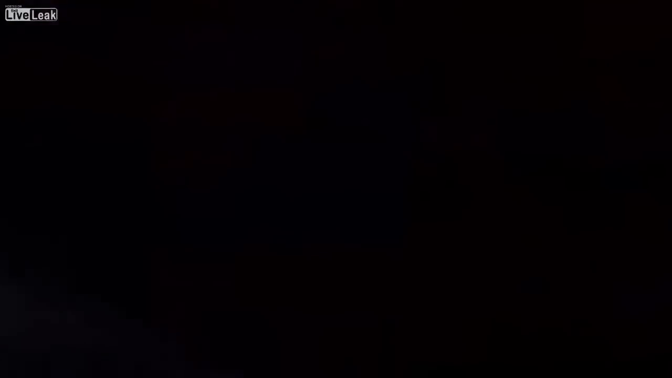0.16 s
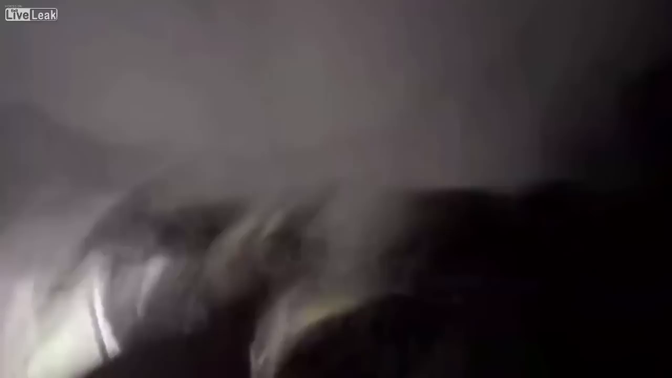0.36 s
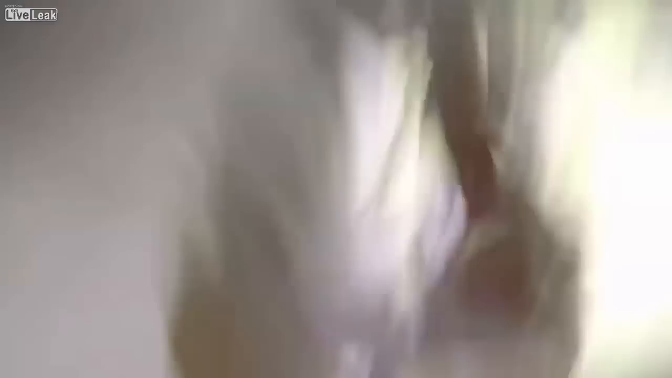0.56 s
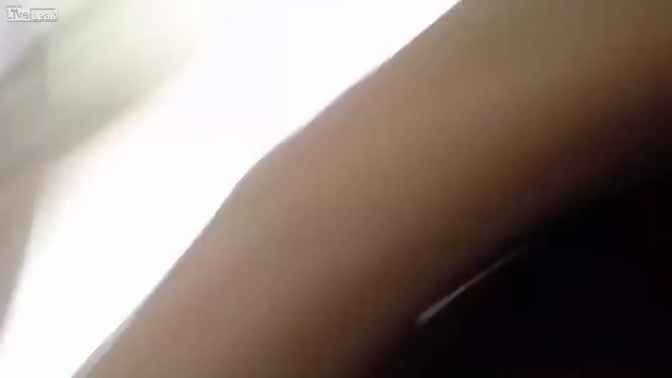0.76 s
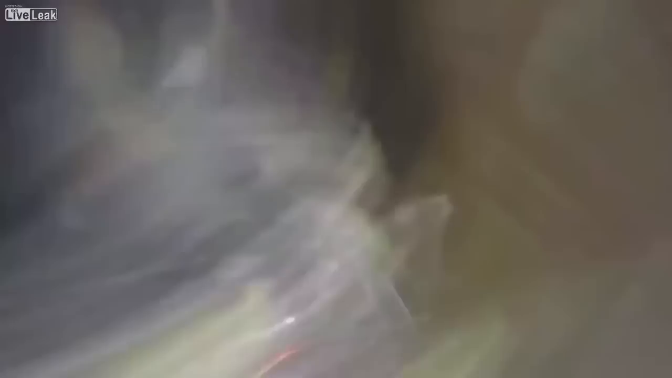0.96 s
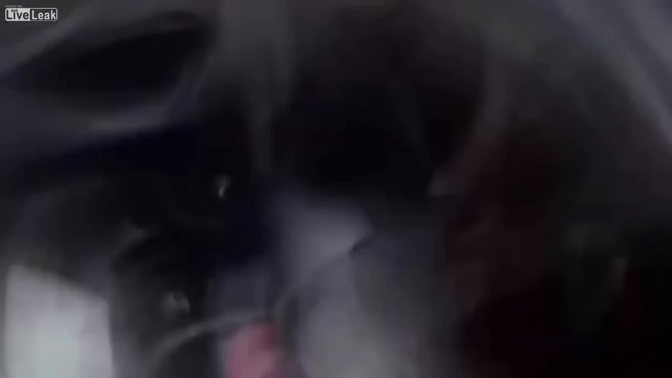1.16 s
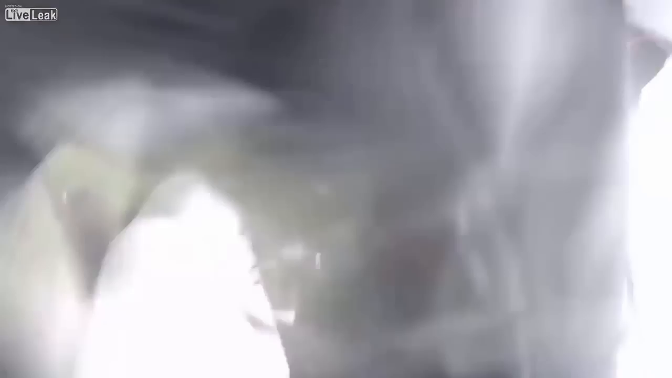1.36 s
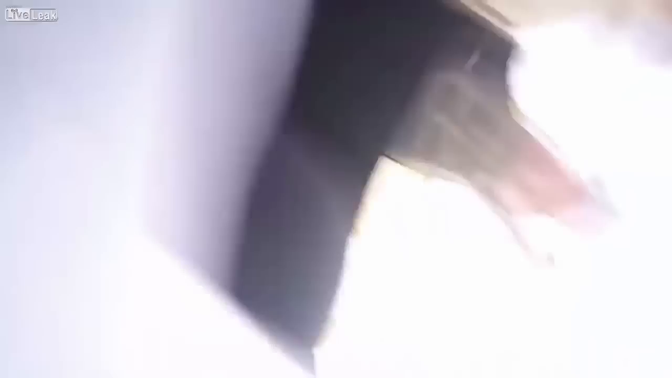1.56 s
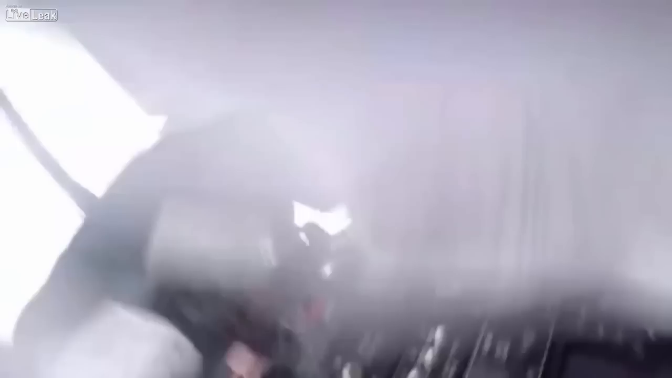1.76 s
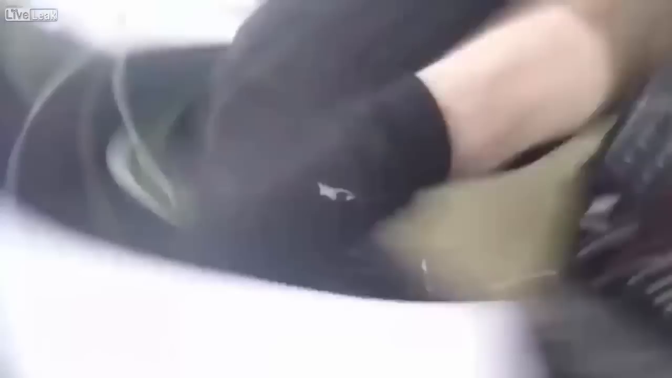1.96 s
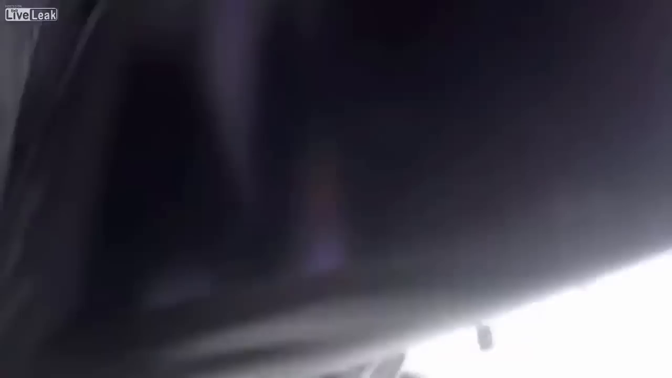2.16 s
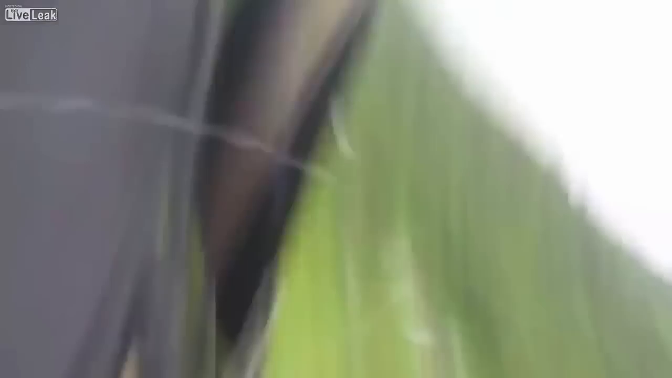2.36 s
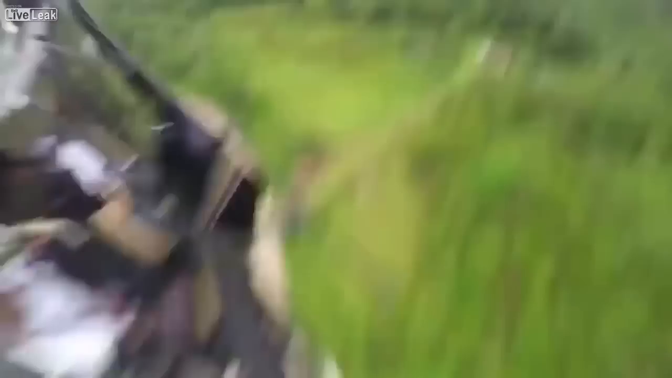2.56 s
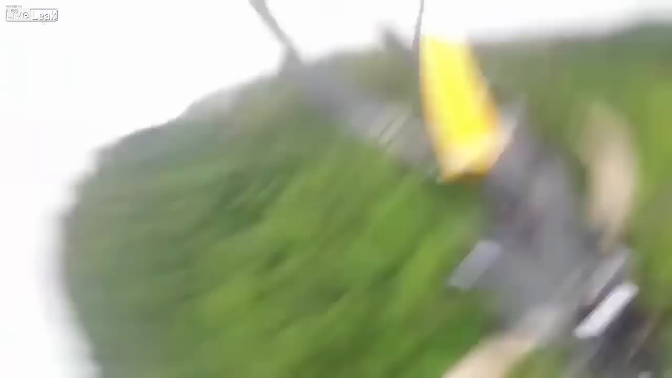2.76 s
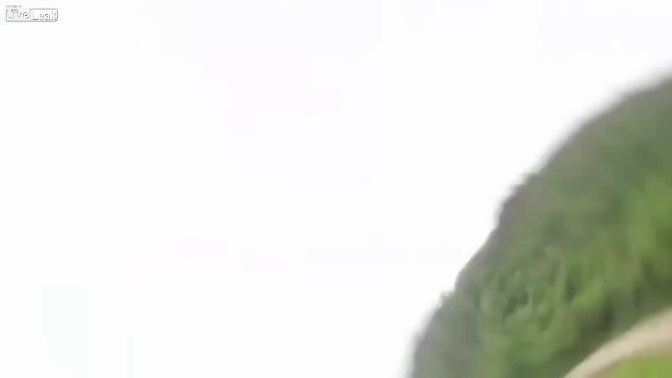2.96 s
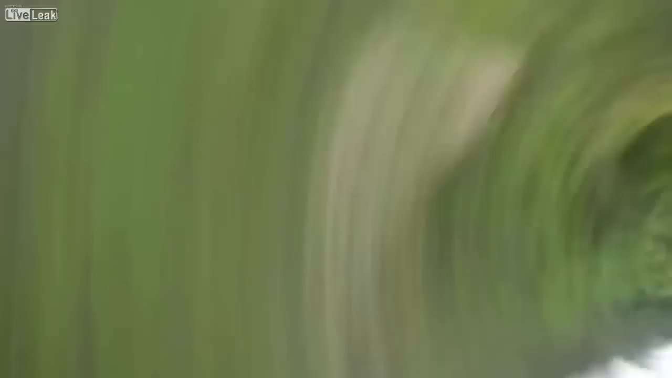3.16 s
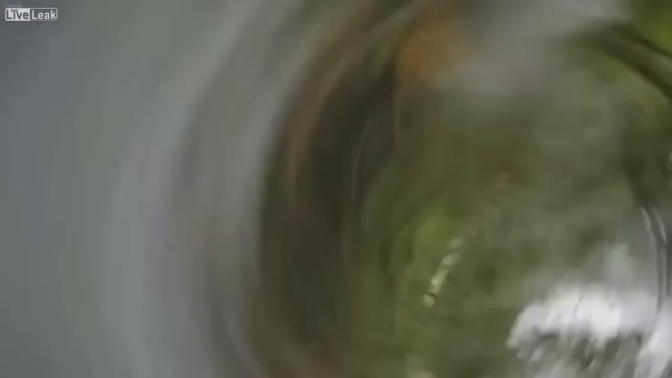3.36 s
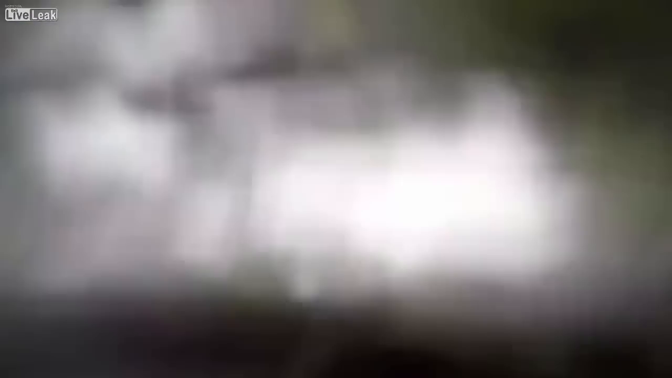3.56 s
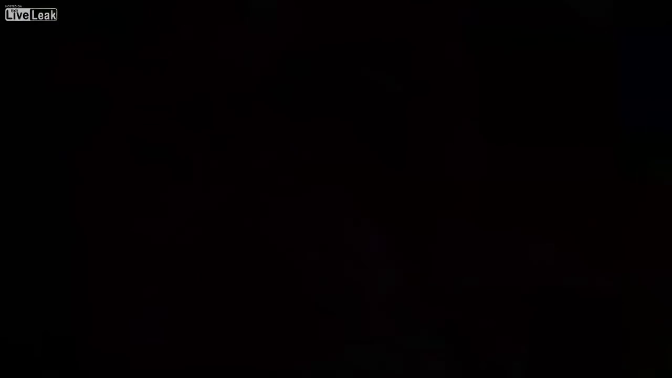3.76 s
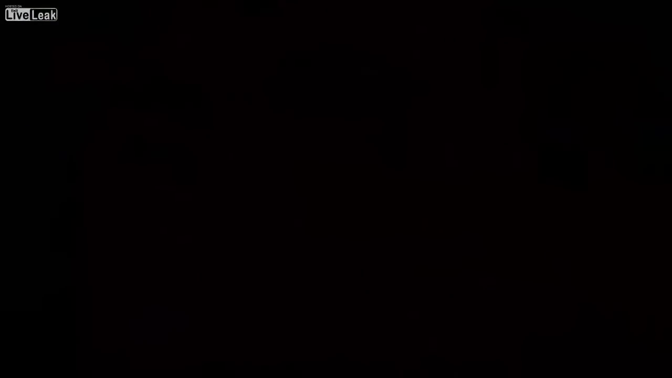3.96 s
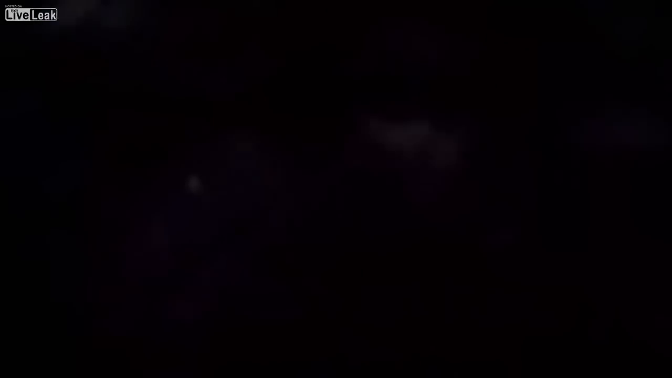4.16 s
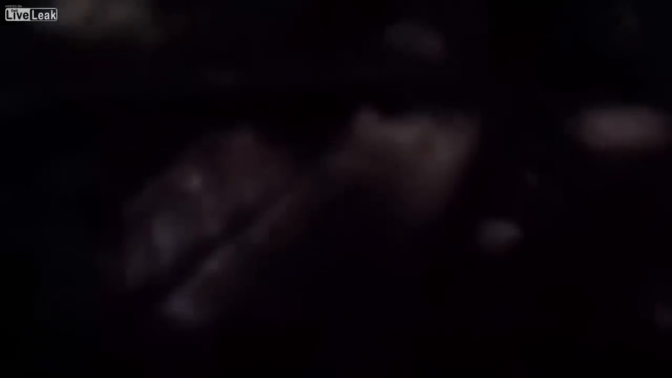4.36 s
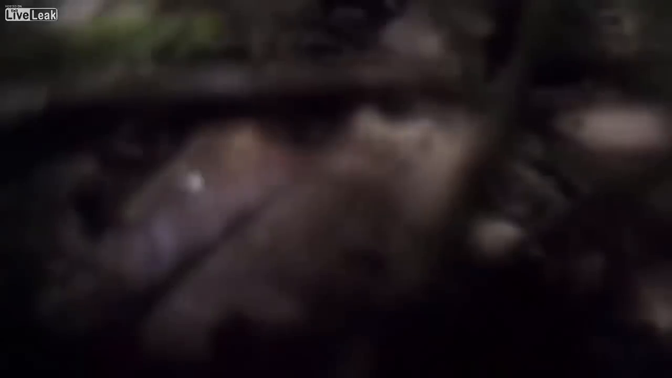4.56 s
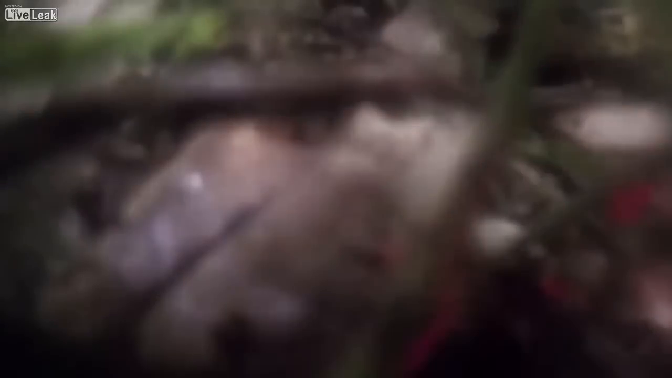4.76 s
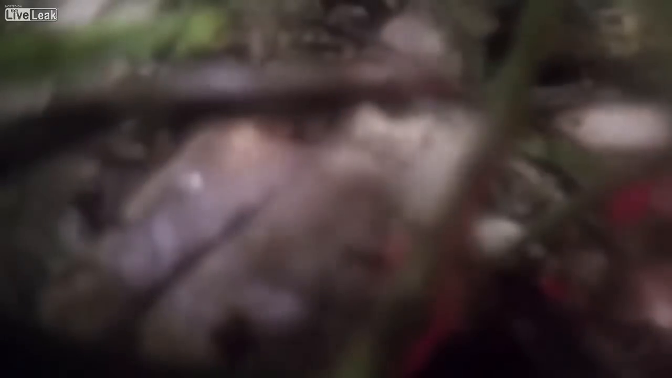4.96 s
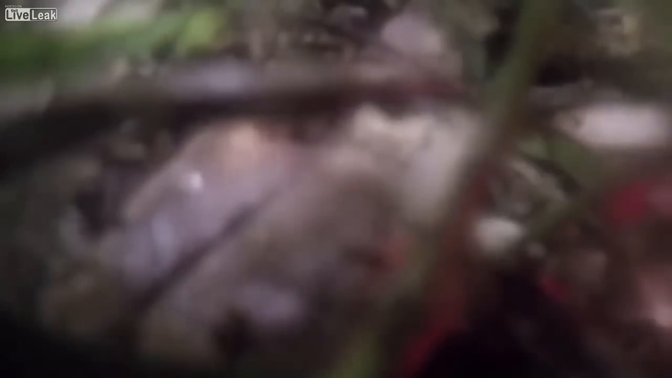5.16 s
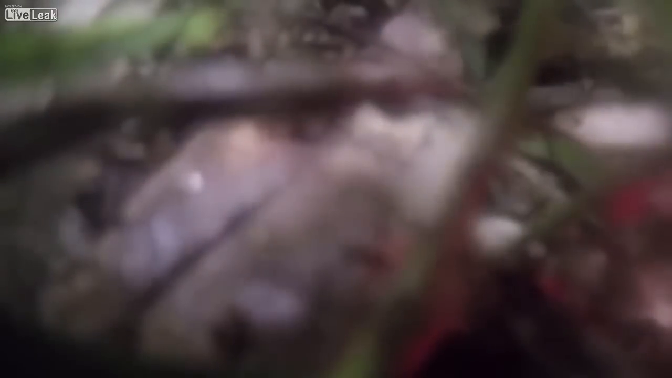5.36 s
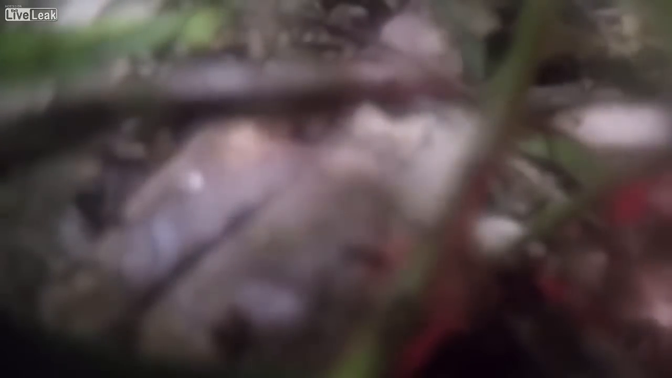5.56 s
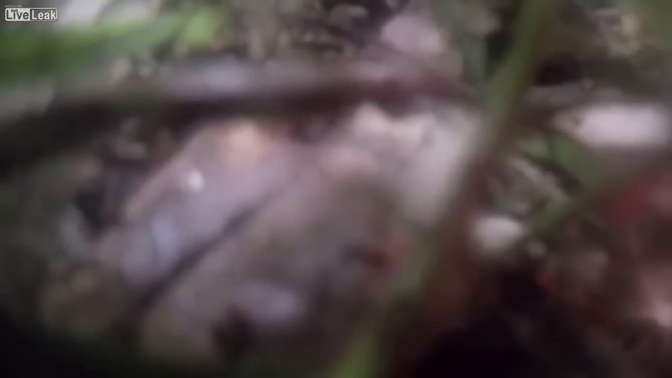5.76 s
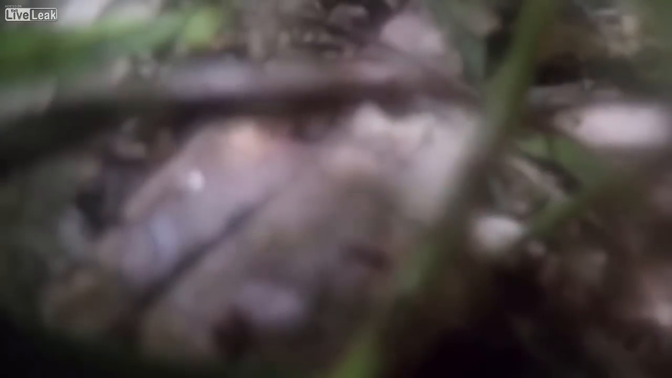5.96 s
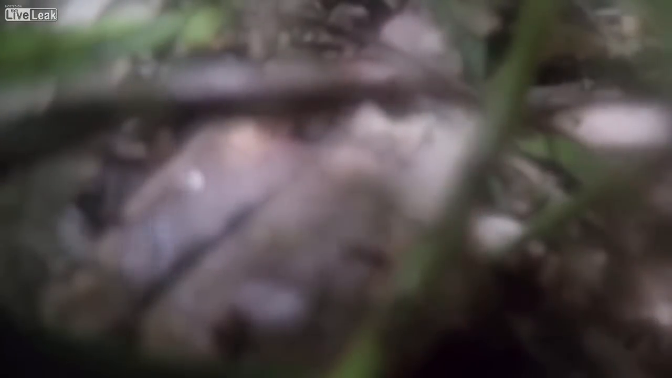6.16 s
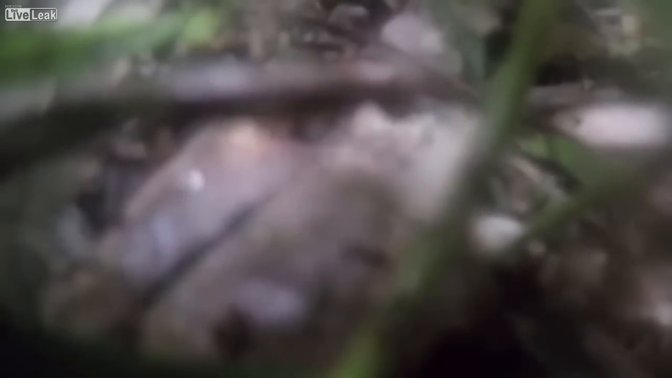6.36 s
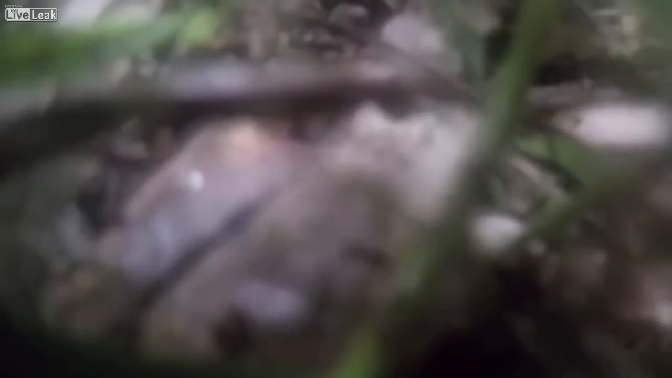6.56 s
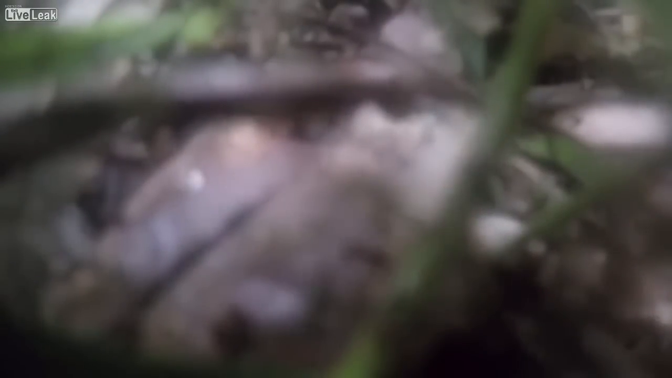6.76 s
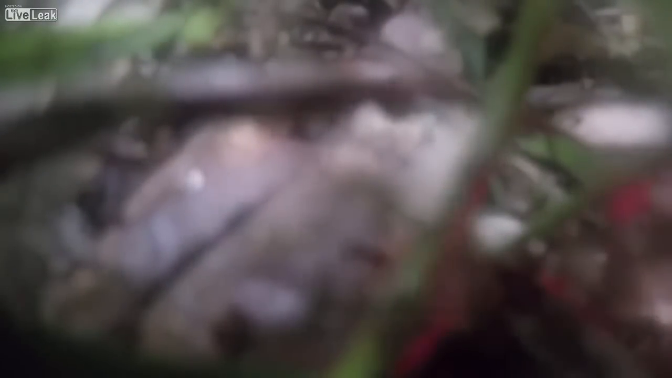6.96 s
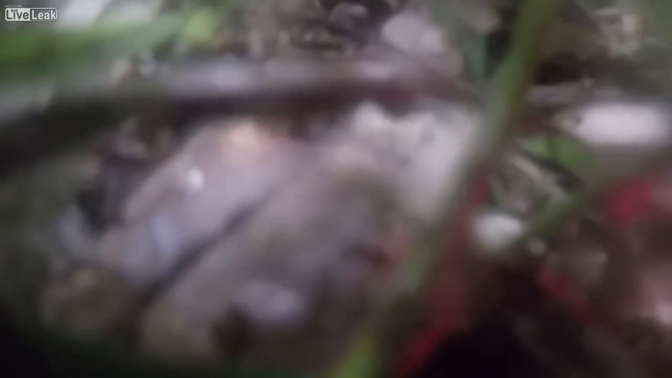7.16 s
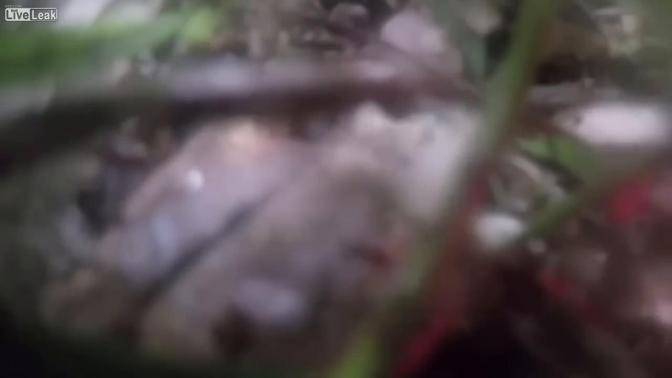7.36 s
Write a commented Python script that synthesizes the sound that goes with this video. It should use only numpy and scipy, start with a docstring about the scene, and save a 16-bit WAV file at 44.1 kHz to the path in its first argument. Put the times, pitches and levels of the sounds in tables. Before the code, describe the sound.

Violent clattering blows and splintering wreckage, a fluttering rush of air, a crashing landing through foliage, then quiet undergrowth with tiny twig taps.

```python
"""A cased camera thrown from a breaking helicopter

A helicopter breaks up around a small camera in a hard case: the camera is battered about the cabin, is flung
out through rushing air, crashes through branches and settles in the undergrowth, where twigs tick.
Blows are bursts of noise filtered by the struck piece; case and metal fitting ring as decaying modes, and the
air inside heaves. Wreckage, wind and leaves are coloured, fluctuating noise; the microphone overloads softly."""
import sys
import numpy as np
from scipy import signal
from scipy.fft import rfft, irfft
from scipy.io import wavfile
from scipy.ndimage import uniform_filter1d

SR = 44100
rng = np.random.default_rng(int(sys.argv[2]) if len(sys.argv) > 2 else 0)


def store_wav(level_fs):
    """Save 16-bit WAV to argv[1]."""
    pcm = np.round(np.clip(np.atleast_2d(level_fs), -1, 1) * 32767)
    wavfile.write(sys.argv[1], SR, pcm.T.astype(np.int16))


N = 326340
TIME = np.arange(N) / SR  # seconds
FREQS = np.fft.rfftfreq(N, 1 / SR)  # hertz

# Blows on the case. Each row: start in seconds, contact length in seconds, level in dB before the blow trim,
# hardness in dB (negative a dull knock, positive a brittle snap), pitch of the struck piece in Hz,
# peak heave of the air inside in dB.
BLOWS = [(0.0207, 0.0075, -13, -7.5, 1855, -7.5), (.107, 0.0012, -17, -10.5, 1100, -40),
         (.144, 0.0027, -17.5, -8, 670, -41), (.161, .015, -29.5, -13, 940, -33),
         (.207, 0.00075, -16.5, -12, 1060, -46.5), (0.221, 0.0037, -15, -9.5, 1110, -40),
         (.229, 0.0036, -20, -13, 880, -40), (0.237, 0.0025, -11.5, -10, 1910, -21),
         (0.253, 0.0009, -8, -7, 730, -30), (0.282, 0.0034, -24, -8, 487, -10.5),
         (0.313, 0.0055, -19, -1, 3420, -33), (0.321, 0.011, -19, -1.5, 1780, -21.5),
         (0.329, 0.013, -10, -3, 1910, -9.5), (0.3504, 0.016, -20, -3.5, 990, -9),
         (0.3852, 0.0028, -8.5, -2, 3000, -14), (.392, .004, -22.5, 5.5, 1850, -35),
         (.4315, 0.0046, -16, 8, 3380, -43), (.448, 0.0031, -14.5, 19, 3327, -21),
         (0.538, 0.0036, -16, 8, 2600, -16.5), (0.585, 0.0033, -21.5, 6.5, 1880, -30),
         (0.6138, 0.0017, -10.5, -46, 1050, -22.5), (.648, 0.0047, -11.5, -22, 1040, -12.5),
         (0.6556, 0.0042, -25.5, 8.5, 3300, -35), (.692, 0.0036, -18, -11, 530, -7.5),
         (.73, 0.0022, -23, 12.5, 1060, -34.5), (0.817, 0.0047, -23.5, 15.5, 8600, -17.5),
         (0.8746, 0.0034, -3, -1.5, 1680, -22.5), (.88, 0.006, -16.5, 2.5, 1600, -28.5),
         (.892, 0.0036, -4.5, 0, 2520, -7), (.919, 0.006, -22, 8, 2610, -33),
         (.929, 0.01, -21.5, 8.5, 2550, -23), (0.97, 0.014, -10, -1.5, 1770, -7.5),
         (.985, 0.0076, -13, 4.5, 1270, -12), (0.997, .015, -12.5, -1.5, 1800, -8.5),
         (1.033, .009, -10.5, -3.5, 1920, -14.5), (1.0812, 0.0082, -13.5, -2.5, 1890, -14.5),
         (1.086, 0.0033, -16.5, -1.5, 1660, -24), (1.112, 0.0084, -13.5, -6, 1490, -26.5),
         (1.118, 0.0024, -10.5, -7.5, 932, -5.5), (1.133, 0.0088, -20, -1, 1600, -19),
         (1.154, 0.0043, -9.5, 0.5, 2194, -18), (1.17, .005, -20.5, 1.5, 1780, -23),
         (1.1789, 0.0087, -15, 0.5, 1990, -22), (1.201, 0.0066, -11, -3.5, 1610, -9),
         (1.223, 0.0036, -16, -6.5, 1610, -30), (1.243, 0.0078, -10.5, -2, 1920, -19),
         (1.2959, 0.0031, -11.5, 5.5, 2260, -13.5), (1.35, 0.0075, -9.5, -1.5, 2120, -5.5),
         (1.384, 0.0035, -14, 15, 2600, -9.5), (1.4107, 0.0025, -9.5, 1, 2400, -11),
         (1.42, 0.0059, -19.5, 13.5, 8400, -26.5), (1.448, .008, -26, 15, 2840, -26),
         (1.5131, 0.0052, -8, -5, 1134, -7.5), (1.537, 0.004, -17.5, 3, 2350, -29),
         (1.5488, 0.0045, -20.5, 16.5, 4990, -27), (1.5643, 0.0027, -4.5, -2.5, 3340, -9),
         (1.7, 0.0057, -26, 4.5, 2120, -30), (1.779, 0.0052, -6.5, -4, 2800, -5.5),
         (1.8365, 0.0038, -20.5, -3.5, 1860, -38.5), (1.849, 0.004, -11, 4, 1600, -27.5),
         (1.868, 0.0096, -20.5, -2, 960, -24.5), (1.882, 0.0078, -5.5, 0.5, 1910, -3),
         (1.9563, 0.0016, -10.5, -15, 520, -3.5), (2.041, 0.0049, -29, 9, 2090, -50),
         (2.076, 0.013, -37, 7.5, 3080, -46), (2.152, 0.0042, -16.5, 15.5, 3360, -55),
         (2.356, 0.0053, -39, 17.5, 8400, -52), (2.417, 0.005, -16.5, -11, 477, -5.5),
         (2.51, 0.0035, -25, -3.5, 494, -11.5), (3.103, 0.013, -17, -1.5, 2110, -31.5),
         (3.304, 0.0077, -20, -7, 478, -7.5), (3.339, 0.0032, 2, -2, 1750, -4.5),
         (3.3926, 0.0057, -21, 20, 6200, -32.5), (3.427, 0.0048, -12, 8, 1720, -30),
         (3.501, 0.0098, -8.5, 1, 2550, -3), (3.5812, .012, -10, 3, 4200, -7),
         (3.594, 0.0055, -19.5, 5.5, 1920, -24.5), (3.632, 0.016, -14.5, -1, 2280, -26.5),
         (3.646, 0.0082, -11, -8, 2110, -5), (3.672, 0.0027, -6, 4, 2060, -5),
         (3.7, 0.0019, -9, -3, 1850, -14.5), (3.946, 0.0021, -21, 2.5, 3330, -18.5),
         (4.041, 0.0032, -26.5, 2, 2040, -59), (4.3218, 0.0016, -22.5, -15, 658, -32),
         (4.336, 0.0026, -27, -9.5, 1410, -45), (4.35, 0.002, -37, -20, 957, -37)]
# Spectrum of rubbed foliage. Each row: frequency in Hz, relative spectral level in dB.
LEAF_COLOUR = [(100, 1), (250, -5.5), (420, -7.5), (640, -2.5), (900, -11), (1400, -7.5), (1750, -1),
               (2300, -2), (2700, -6.5), (3300, -5.5), (4000, -12), (6000, -15), (9000, -21),
               (14500, -27.5)]


def gain_of(db):
    """Level to amplitude: 20 dB is a factor of ten."""
    return np.exp(np.asarray(db) * (np.log(10) / 20))


def evened(x):
    """Normalization to unit rms."""
    return x / np.sqrt(np.mean(x ** 2) + 1e-20)


def read(points, hz):
    """Spectrum interpolated on a logarithmic frequency axis, as pitch is heard."""
    f, value = np.transpose(points)
    return np.interp(np.log(hz + 1), np.log(f + 1), value)


def level(rows, axis=1, fade=0.046):
    """Amplitude envelope from a dB curve, with exponential decay (time constant in s) beyond its ends."""
    s, db = np.transpose(rows)[[0, axis]]
    outside = np.maximum(s[0] - TIME, 0) + np.maximum(TIME - s[-1], 0)
    return gain_of(np.interp(TIME, s, db)) * np.exp(-outside / fade)


def add(mix, s, sound):
    """Superposition: adds a sound to the mix at a time in seconds."""
    part = mix[..., max(round(s * SR), 0):][..., :sound.shape[-1]]
    part += sound[..., :part.shape[-1]]


def wander(hz):
    """Slow random modulation of unit rms, interpolated between 2.2 * hz random values per second."""
    knots = rng.standard_normal(8192)
    return evened(np.interp(TIME * 2.2 * hz, np.arange(len(knots)), knots))


def pair(x, colour_db=0):
    """Interchannel coherence: two unrelated signals become left and right, alike in all but the treble."""
    # Each row: frequency in Hz, coherence from 0 to 1.
    coherence = [(100, 1), (3600, 1), (5000, .89), (9000, .74), (14000, .7)]
    same = np.clip(read(coherence, FREQS), 0, 1)
    mid_side_gain = np.sqrt([(1 + same) / 2, (1 - same) / 2])
    mid, side = irfft(rfft(x) * gain_of(colour_db) * mid_side_gain, N)
    return np.array([mid + side, mid - side])


def noise(colour_db, grain=1):
    """Random excitation shaped by a spectrum: coloured stereo noise, optionally broken into grains."""
    return evened(pair(rng.standard_normal((2, N)) * grain, colour_db))


def causal(db, size=2048):
    """Minimum-phase response: its phase follows from the log spectrum, so it rings only forwards in time."""
    log_gain = np.log(gain_of(np.r_[db, db[-2:0:-1]]))
    return np.fft.ifft(np.exp(np.conj(signal.hilbert(log_gain)))).real[:size]


def resonance(hz, centre_hz, boost_db, q):
    """Resonant peak: power gain falls off either side of the centre, above a flat spectrum, in dB."""
    peak = (gain_of(max(boost_db, 0)) ** 2 - 1) / (1 + (2 * q * (hz / centre_hz - 1)) ** 2)
    return 10 * np.log10(1 + peak)


def patchy(x, depth_db, hz):
    """Independent band modulation: each stretch of the spectrum swells and fades by itself."""
    bands = np.linspace(0, 1, num=6)
    place = np.clip(np.log((FREQS + 1) / 500) / np.log(6000 / 500), 0, 1)
    spectrum = rfft(x)
    out = 0
    for band in bands:
        share = np.maximum(1 - abs(place - band) / bands[1], 0)
        out = out + irfft(spectrum * share, N) * gain_of(depth_db * wander(hz))
    return evened(out)


def rattle(per_second, low_hz, high_hz, cycles, spread_db, count=20):
    """Random impacts on small resonators: many pieces, each with its own pitch, knock at random moments."""
    out, t = np.zeros(N), np.arange(1024) / SR
    tries = 100  # for each piece
    for hz in np.geomspace(low_hz, high_hz, num=count):
        fundamental = np.sin(2 * np.pi * hz * t) * np.exp(-hz * t / cycles)
        overtone = np.sin(2 * np.pi * 1.9 * hz * t) * np.exp(-4 * hz * t / cycles)
        knock = (fundamental + overtone) * (1 - np.exp(-hz * t * 2))  # a blunt edge starts softly
        for s, size, chance in rng.random((tries, 3)) * [N / SR, 1, 1]:
            if chance < per_second * N / SR / (tries * count):
                add(out, s, knock * gain_of(spread_db * min(-np.log(size), 3)))
    return evened(out)


def grind(blows):
    """Stick-slip friction and fracture: panels scrape, pieces rattle, splinters crackle; more debris after blows."""
    # Each row: time in seconds, level in dB before the layer trims, fine crackle in dB before its trim.
    wreckage = [(0.0, -35, -62), (0.27, -38, -70), (0.45, -28, -40.5), (0.53, -26, -47), (0.66, -37, -48),
                (0.79, -37, -54), (0.95, -31, -40.5), (1.04, -28.5, -44), (1.09, -37, -43),
                (1.22, -25.5, -53), (1.33, -33.5, -52.5), (1.5, -30, -41.5), (1.65, -34.5, -56.5),
                (1.77, -33, -48), (1.88, -38, -61), (2.02, -45, -62), (2.25, -39, -58), (2.4, -32.5, -57)]
    # Each row: frequency in Hz, relative spectral level in dB.
    scrape_colour = [(100, -8.5), (300, -2.5), (500, -5), (700, -8.5), (1020, 1), (1350, -7), (1800, 3),
                     (2500, -4), (3400, -2.5), (4300, -12.5), (6000, -30), (12000, -50)]
    splinter_colour = [(2500, -44.5), (5000, 5.0), (8000, -1), (14000, -9)]  # Hz, relative dB
    debris_db, debris_s = -11.5, 0.0057  # level under the blow, decay of its amplitude

    scrape = noise(read(scrape_colour, FREQS), gain_of(3.5 * wander(160)))
    scrape = patchy(scrape, depth_db=1.2, hz=45)
    pieces = rattle(per_second=48, low_hz=610, high_hz=3620, cycles=1.0, spread_db=14.0)
    splinters = noise(read(splinter_colour, FREQS), gain_of(3.8 * wander(200)))
    # debris follows the smoothed power of the blows
    keep = np.exp(-2 / (debris_s * SR))
    blow_power = signal.lfilter([1 - keep], [1, -keep], blows[0] ** 2)
    debris = gain_of(debris_db) * np.sqrt(blow_power)
    coarse = gain_of(-5.5) * scrape + gain_of(-9.5) * pieces
    crackle = gain_of(1.5) * level(wreckage, axis=2) * splinters
    return np.hypot(level(wreckage), debris) * coarse + crackle


def buffet():
    """Low-frequency pressure fluctuation at the microphone, from moving air and the shaking mount."""
    # Each row: time in seconds, level in dB before the trim.
    pressure = [(0.0, -13.5), (0.12, -27), (0.76, -34.5), (1.23, -25), (1.38, -29.5), (1.55, -46),
                (2.25, -34.5), (2.51, -20), (2.86, -34), (3.15, -31), (3.38, -36), (3.54, -24.5),
                (3.67, -45.5), (4.12, -74), (5.07, -75.5), (6.22, -60), (6.92, -55), (7.4, -62.5)]
    # Each row: frequency in Hz, relative spectral level in dB.
    colour = [(10, -24.5), (25, 6.5), (50, -2.5), (90, -12), (160, -21.5), (300, -26.5), (700, -67.5)]
    return gain_of(2.0) * level(pressure) * noise(read(colour, FREQS))


def contacts(rows, colour, piece_db, db_per_doubling, q, size=2048):
    """Impact excitation and response: a short run of micro-fractures rings the struck piece."""
    # A harder contact trades knock for snap. Each row: frequency in Hz, gain in dB per dB of hardness.
    hardness_tilt = [(400, -1.0), (1100, -0.71), (2000, 0), (3200, 0.35), (6000, 1.13)]
    usual_contact_s = .004
    release_s, chatter_db, chatter_s = .0018, -20, .008  # a fast stop, then a faint chatter

    out, hz, t = np.zeros((2, N)), np.fft.rfftfreq(size, 1 / SR), np.arange(size) / SR
    second_half_fade = np.clip(2 - 2 * t / t[-1], 0, 1)
    for s, length, db, hardness, piece_hz, *_ in rows:
        length = max(length, 1 / 2000)
        press = np.exp(-.7 * t / length - np.maximum(t - length, 0) / release_s)
        shape = press + gain_of(chatter_db) * np.exp(-t / chatter_s)
        fractures = gain_of(0.99 * np.repeat(rng.standard_normal(size // 16), 16))  # uneven in strength
        force = rfft(rng.standard_normal((2, size)) * shape * fractures)
        # flattened, so that every band is excited
        force /= np.sqrt(uniform_filter1d(abs(force) ** 2, size=61, axis=1))

        # every piece has its own treble
        own_points = np.c_[np.geomspace(3000, 15000, num=7), 2.5 * rng.standard_normal(7)]
        own = read(own_points, hz) * (hz > 3000)
        # db_per_doubling sets how the ring changes with contact length
        rung_db = piece_db + db_per_doubling * np.log2(length / usual_contact_s)
        tilt = hardness * read(hardness_tilt, hz)
        body = causal(read(colour, hz) + tilt + own + resonance(hz, piece_hz, rung_db, q))
        crack = signal.fftconvolve(irfft(force) * second_half_fade, body[None], axes=1)[:, :size]

        # the treble is strongest at the first fracture
        dull = signal.convolve(crack, signal.firwin(25, 4000, fs=SR)[None], "same")
        crack = dull + (crack - dull) * (0.38 + 1.0 * np.exp(-t / (0.71 * length)))
        # level is the rms as if all the energy fell within the contact
        add(out, s, gain_of(db) * crack * np.sqrt(length * SR / (crack ** 2).sum(1, keepdims=True)))
    return pair(out)


def blows_on_case():
    """Impacts on a hard shell: broad cracks coloured by the struck piece, ringing less after longer contact."""
    # Each row: frequency in Hz, spectral gain in dB.
    colour = [(60, -3), (200, 7.5), (450, 1.5), (700, -1), (1100, 0), (1500, -2), (1850, 0.5), (2500, -2),
              (3600, -5.5), (5000, -10), (8000, -17), (10000, -20.5), (14000, -26)]
    return gain_of(.8) * contacts(BLOWS, colour, piece_db=12, db_per_doubling=-1, q=14)


def ring(blows):
    """Modal response: every blow excites the case's short, exponentially damped resonances."""
    # Each row: frequency in Hz, level in dB before the case gain, time to decay by 60 dB in seconds.
    case_modes = [(1670, -18.5, 0.069), (3300, -26.5, 0.056), (980, -16, .05), (482.6, -18, 0.12)]
    case_db = -38
    t = np.arange(SR // 4) / SR
    modes = sum(gain_of(db - 60 * t / t60) * np.cos(2 * np.pi * hz * t) for hz, db, t60 in case_modes)
    return gain_of(case_db) * signal.fftconvolve(blows, modes[None], axes=1)[:, :N]


def jolts(damping=0.65, rise=0.0018):
    """Damped oscillation of enclosed air: a blow squeezes it into one heavy swing that dies in two cycles."""
    # the swing runs from about 2.1 down to 0.55 times this pitch
    reference_hz, spread_octaves = 58.4, 0.6
    lag_share = 0.6  # of the contact length
    out, t = np.zeros(N), np.arange(SR // 5) / SR
    for s, length, *_, heave_db in BLOWS:
        hz = reference_hz * 2 ** (spread_octaves * (2 * rng.random() - 1))
        turns = hz * (0.55 * t + 0.011 * (1 - np.exp(-t / 0.0069)))  # the swing slows as it dies
        swing = np.sin(2 * np.pi * turns) * np.exp(-turns / damping) * (1 - np.exp(-t / rise))
        add(out, s + lag_share * length, -gain_of(heave_db) * swing / abs(swing).max())
    return out


def pings():
    """Free vibration of metal: a small fitting sings on in damped modes after the blows that reach it."""
    # Each row: start in seconds, level in dB.
    strikes = [(.026, -30.5), (0.389, -32), (.895, -24.5), (1.004, -21.5), (1.245, -22), (1.354, -19),
               (1.783, -23), (1.894, -19.5), (3.345, -30.5), (3.512, -24.5), (3.587, -19.5), (3.689, -22.5),
               (4.043, -41.5)]
    # Each row: frequency in Hz, level in dB relative to the strike, decay time as a factor on fitting_t60_s.
    fitting_modes = [(1850, 0.5, 0.94), (1870, -12.5, 0.77), (3400, -14.5, 0.44), (1120, -19.5, .35)]
    fitting_t60_s = .21
    out, t = np.zeros(N), np.arange(SR // 2) / SR
    tone = 0
    for hz, db, share in fitting_modes:
        tone = tone + gain_of(db - 60 * t / (fitting_t60_s * share)) * np.sin(2 * np.pi * hz * t)
    for s, db in strikes:
        add(out, s, gain_of(db) * tone * (1 - np.exp(-t / .002)))
    return out


def slides(size=16384):
    """Sliding friction: stems and debris rub in gritty strokes that swell and die, coloured by a resonance."""
    # Each row: start in seconds, peak level in dB, duration in seconds (the peak comes at half of it),
    # pitch of the rubbing piece in Hz, strength of that pitch in dB.
    strokes = [(0.147, -38.5, 0.19, 980, 28.5), (0.691, -28, 0.034, 1020, 22.5),
               (1.669, -29, .028, 1040, 13.5), (4.347, -48.5, 0.031, 867, 25),
               (5.146, -51, 0.02, 2040, 2.5), (5.658, -53, 0.045, 3250, 12), (5.838, -48, 0.027, 3000, 9),
               (6.166, -40, 0.029, 1310, 12.5), (6.262, -54, 0.029, 580, 22),
               (7.091, -49, 0.04, 2300, -2.5)]
    out, hz, t = np.zeros((2, N)), np.fft.rfftfreq(size, 1 / SR), np.arange(size) / SR
    for s, db, duration, piece_hz, piece_db in strokes:
        roughness = gain_of(2.4 * np.repeat(rng.standard_normal(size // 64), 64))
        grit = rng.standard_normal((2, size)) * roughness
        colour_db = read(LEAF_COLOUR, hz) + resonance(hz, piece_hz, piece_db, q=3.3)
        rub = evened(irfft(rfft(grit) * gain_of(colour_db)))
        add(out, s, gain_of(db) * rub * (2 * t / duration) * np.exp(1 - 2 * t / duration))
    return pair(out)


def rush():
    """Turbulence and cavity resonance: air hisses over the case's edges, sounds its cavities, surges as it spins."""
    # Each row: time in seconds, steady level in dB, level of the surges in dB.
    airflow = [(2.39, -68.5, -54), (2.425, -24.5, -13), (2.55, -23, -16), (2.62, -27, -16.5),
               (2.7, -25, -22), (2.79, -22.5, -12.5), (2.87, -27, -31.5), (2.95, -20, -17),
               (3.06, -38, -18.5), (3.22, -21, -14), (3.318, -26.5, -15.5)]
    # Each row: frequency in Hz, relative spectral level in dB; the same for the gusts.
    hiss_colour = [(100, -10.5), (200, -6), (380, -12), (600, -11.5), (780, -12.5), (1250, -7),
                   (1580, -4.5), (1700, -2), (2250, 0.5), (2700, -6), (3400, -10.5), (4600, -10),
                   (6500, -17.5), (10000, -21.5), (14000, -29)]
    gust_colour = [(100, -15.5), (400, -3.5), (800, -17), (1560, -10.5), (1720, 7), (2250, 6.5),
                   (2800, 0.5), (3400, 0), (4600, -10.5), (7000, -22), (14000, -33.5)]
    # Each row: frequency in Hz, width in Hz at half power, level in dB relative to the hiss spectrum's 0 dB.
    cavities = [(997, 72, 0), (3156, 80, -0.5), (3920, 200, -13), (8100, 250, -16), (11900, 620, -23.5)]
    # The largest cavity. Each row: time in seconds, level in dB before the trim.
    moan_level = [(2.22, -51), (2.27, -37.5), (2.39, -40), (2.45, -39), (2.7, -38.5), (2.93, -26),
                  (3.1, -29.5), (3.33, -22)]
    moan_hz, moan_half_width_hz = 490, 48  # 6 dB down at the half width
    # the case turns edge-on to the air at a steady rate
    first_surge_s, surge_period_s, surge_spread_s = 2.446, .087, .019

    power = gain_of(read(hiss_colour, FREQS)) ** 2
    for hz, width, db in cavities:
        power = power + gain_of(db) ** 2 / (1 + (2 * (FREQS - hz) / width) ** 2)
    hiss = noise(10 * np.log10(power), gain_of(1.8 * wander(90)))
    steady = level(airflow, fade=0.068) * patchy(hiss, depth_db=2.0, hz=29.9)

    half_period_s = surge_period_s / 2
    off_edge_s = (TIME - first_surge_s + half_period_s) % surge_period_s - half_period_s
    surge = level(airflow, axis=2) / (1 + (off_edge_s / surge_spread_s) ** 2 / 2) ** 2
    gusts = surge * noise(read(gust_colour, FREQS), gain_of(3.0 * wander(200)))

    moan_colour = -20 * np.log10(1 + ((FREQS - moan_hz) / moan_half_width_hz) ** 2)
    moan = gain_of(-5) * level(moan_level) * noise(moan_colour, gain_of(4.9 * wander(40)))
    return steady + moan + gusts


def leaves():
    """Superposed light contacts: foliage rustles as it settles, with tiny ticks of grit and stalks."""
    # Each row: time in seconds, level in dB before the layer trims.
    settling = [(3.36, -31.5), (3.53, -32.5), (3.76, -51), (4.45, -57), (5.27, -59), (5.7, -56.5),
                (5.81, -56), (6.37, -51), (6.71, -56.5), (6.93, -57.5), (7.11, -54.5), (7.4, -52)]
    rustle = noise(read(LEAF_COLOUR, FREQS), gain_of(2.93 * wander(120)))
    rustle = patchy(rustle, depth_db=-3.5, hz=6)
    ticks = rattle(per_second=23, low_hz=1090, high_hz=5700, cycles=2.8, spread_db=3.5)
    return level(settling) * (gain_of(-1.87) * rustle + gain_of(-11.5) * ticks)


def twigs_on_case():
    """Light impacts on the grounded case: a longer rub rings the twig's own resonance more."""
    # Each row: start in seconds, contact length in seconds, level in dB before the twig trim,
    # hardness in dB, pitch of the twig in Hz.
    touches = [(3.798, 0.016, -42, -4, 1630), (3.827, .007, -36.5, 4, 1800),
               (3.847, .006, -40.5, -8.5, 1970), (4.018, 0.002, -35.5, -2.5, 1700),
               (4.153, 0.003, -40.5, 6, 6530), (4.216, 0.0041, -45, -2, 1970),
               (4.248, 0.0026, -43, 6, 6000), (4.617, 0.0058, -37.5, -12.5, 1240),
               (4.629, 0.0066, -44, 8, 2240), (4.703, .008, -50, -1, 4700), (4.78, 0.0014, -46, 21, 5780),
               (4.823, 0.0097, -53.5, -3.5, 1240), (4.9275, 0.0032, -31.5, -6, 1784),
               (5.283, 0.0064, -46.5, -6, 1774), (5.712, 0.0024, -38.5, -1, 1900),
               (5.759, 0.0011, -34.5, -5, 2960), (5.782, 0.0028, -25, 4, 3100),
               (5.9295, 0.0074, -44, -9, 3190), (5.989, 0.0064, -41.5, -5, 2170),
               (6.01, 0.0043, -41, -10, 3180), (6.015, 0.0042, -33.5, -2.5, 1970),
               (6.37, 0.0083, -43, -2, 1950), (6.42, 0.0017, -40, -2.5, 2200),
               (6.458, 0.0084, -43.5, 1, 2030), (6.481, 0.0074, -38, 3.5, 1710),
               (6.58, 0.0096, -42.5, 2.5, 1730), (6.664, 0.01, -46, -8, 2370),
               (6.8885, 0.01, -43, -1.5, 1915), (6.948, 0.012, -38, 1, 1700),
               (6.9636, 0.018, -39.5, 1, 1690)]
    # Each row: frequency in Hz, spectral gain in dB.
    colour = [(60, 3), (250, -6.5), (500, -8), (750, -1), (1400, 0.5), (1750, 3.5), (2400, 2.5), (3300, 1),
              (4200, -6), (6000, -4), (9000, -18.5), (14000, -22)]
    return gain_of(.1) * contacts(touches, colour, piece_db=10, db_per_doubling=6.5, q=26)


def scene():
    """Linear superposition of blows, twigs and ringing over wreckage, wind and foliage."""
    blows = blows_on_case()
    hits = blows + twigs_on_case() + ring(blows) + pings() + jolts()
    return hits + grind(blows) + rush() + buffet() + leaves() + slides()


def record(dry):
    """Transducer saturation: the microphone passes no steady pressure, overloads softly and is band-limited."""
    overload, edge_hz = .87, 14500  # ceiling in full scale, upper band limit
    moving = signal.lfilter(*signal.butter(1, 6, "high", fs=SR), dry)
    squashed = moving / (1 + (moving / overload) ** 6) ** (1 / 6)
    low_pass = signal.firwin(255, edge_hz, window=("kaiser", 8), fs=SR)
    return signal.oaconvolve(squashed, low_pass[None], "same")


dry = scene()
out = record(dry)
store_wav(out)
```